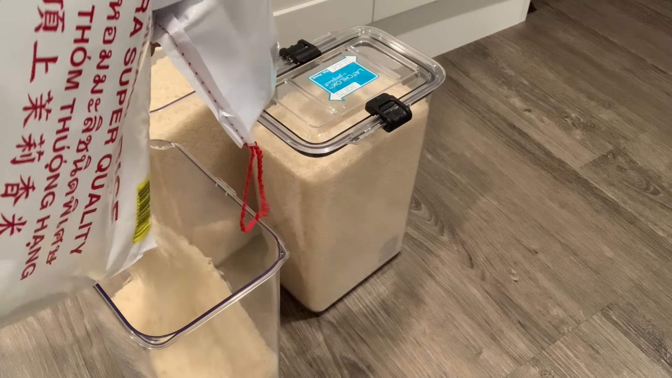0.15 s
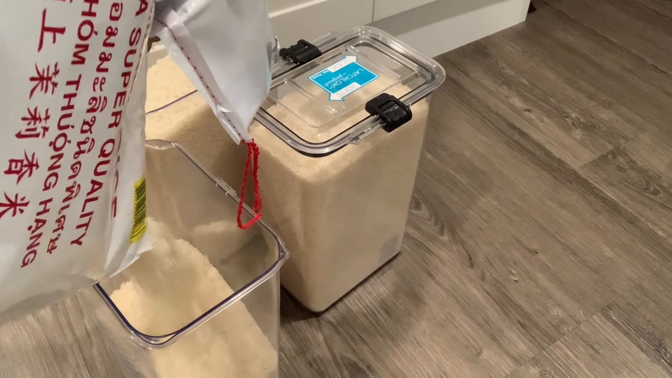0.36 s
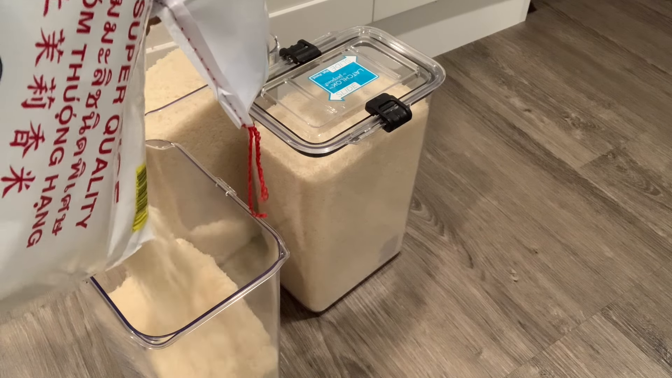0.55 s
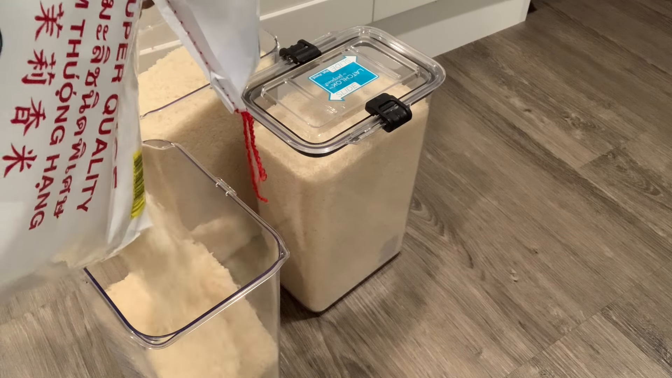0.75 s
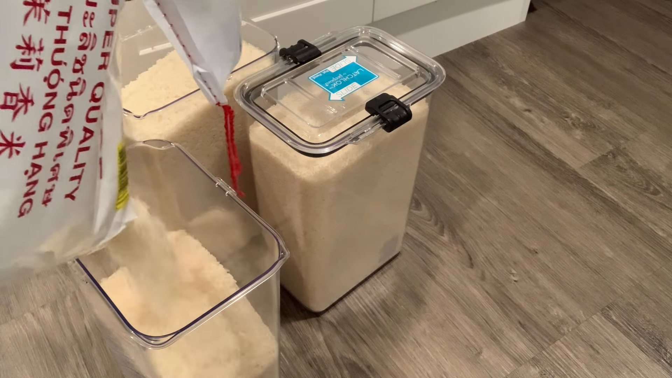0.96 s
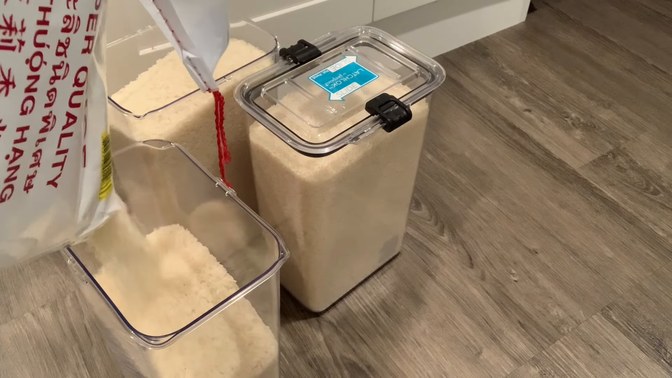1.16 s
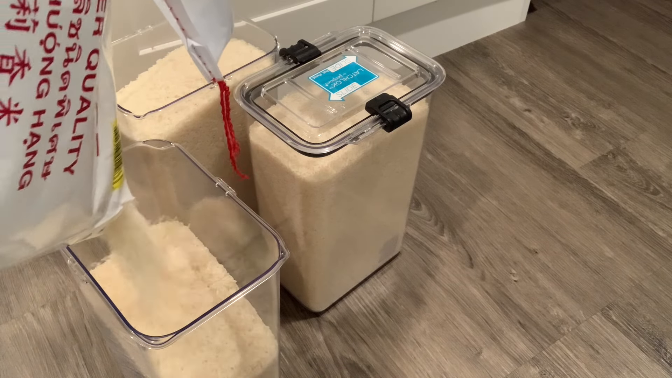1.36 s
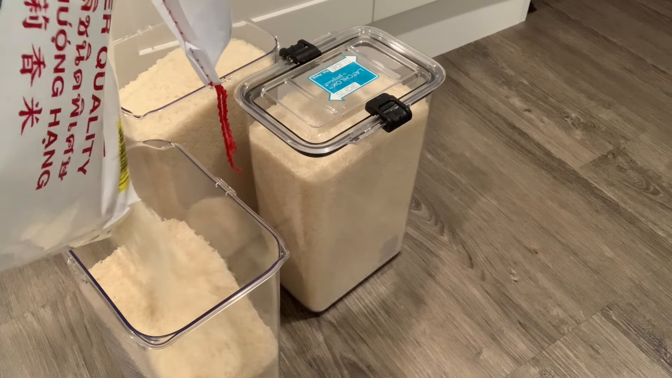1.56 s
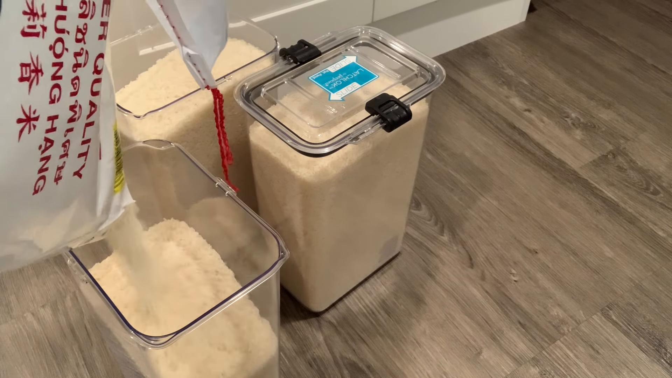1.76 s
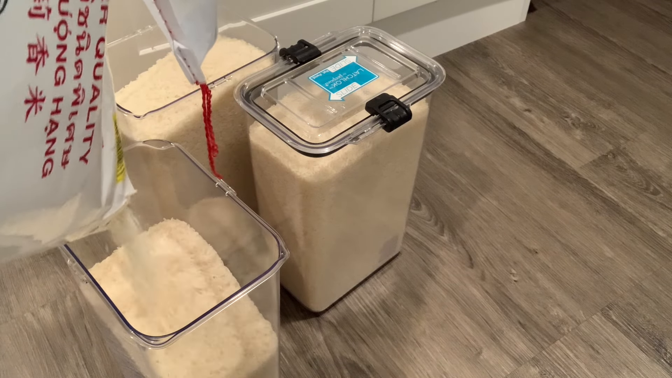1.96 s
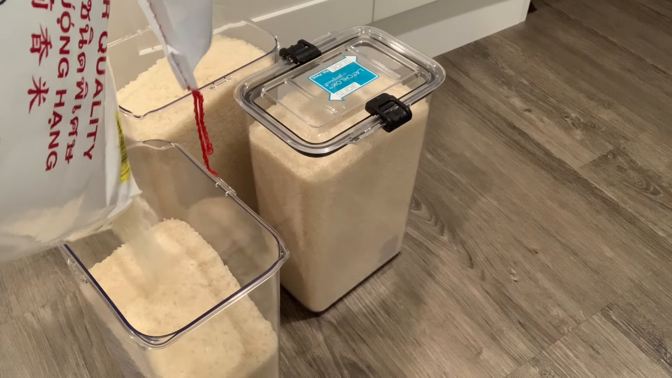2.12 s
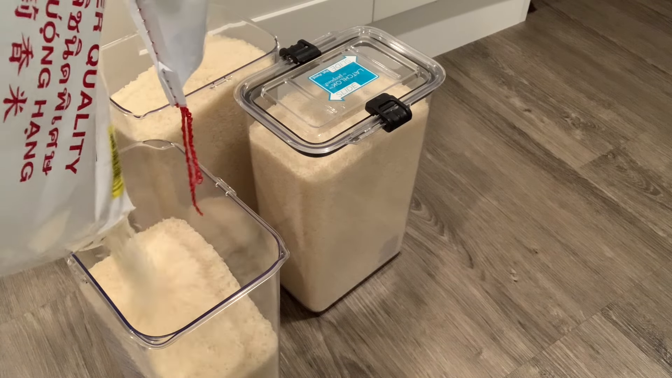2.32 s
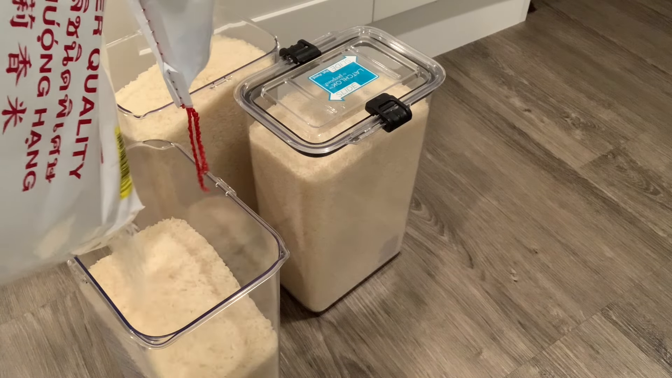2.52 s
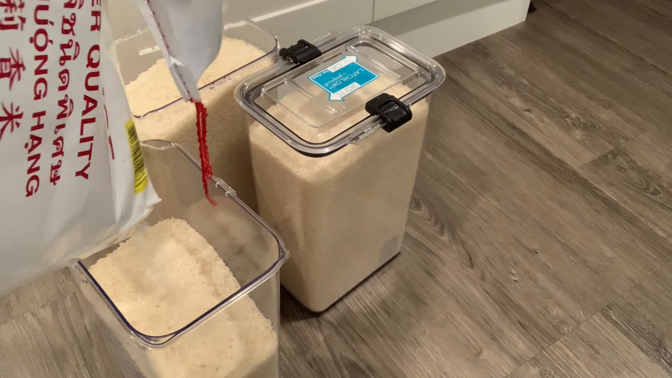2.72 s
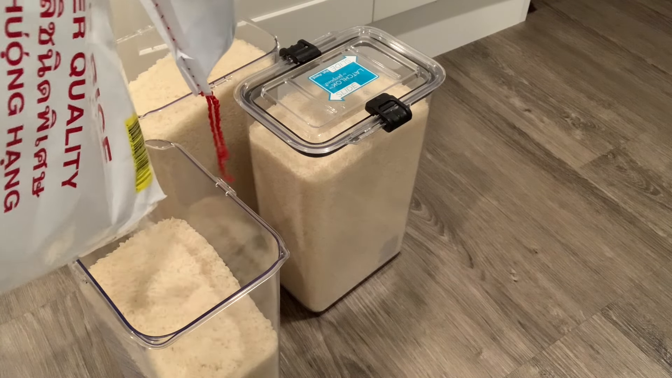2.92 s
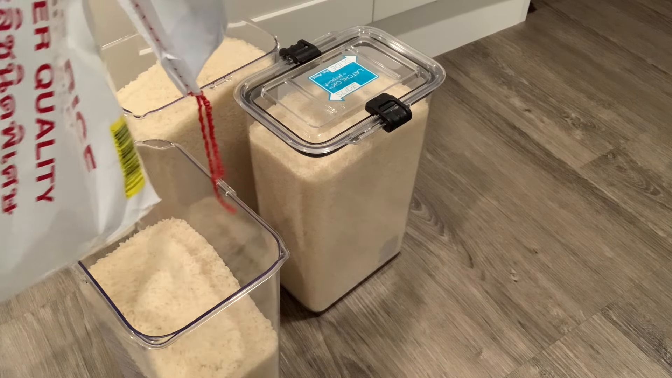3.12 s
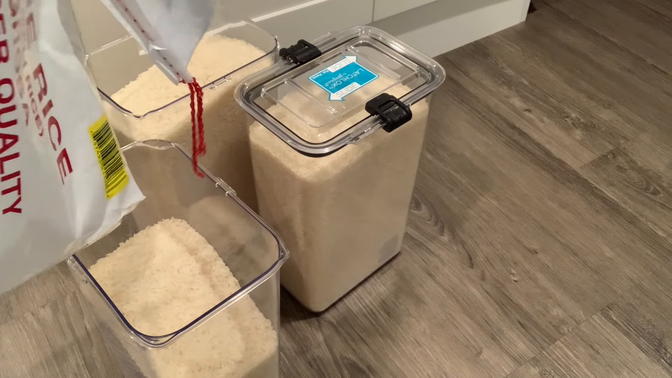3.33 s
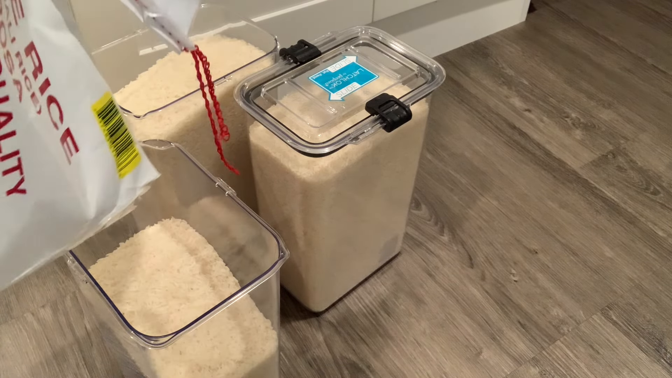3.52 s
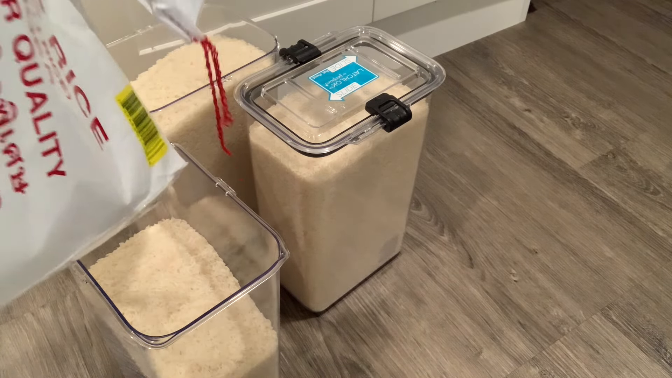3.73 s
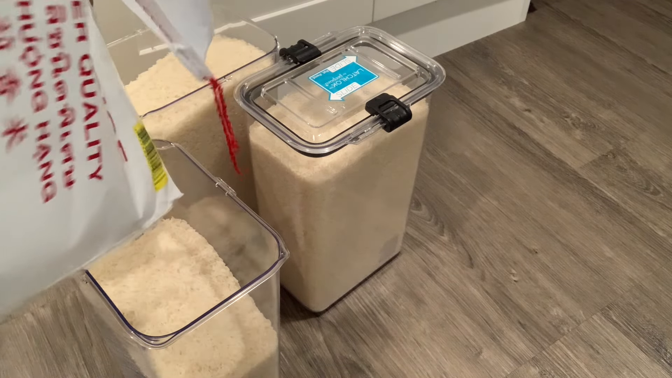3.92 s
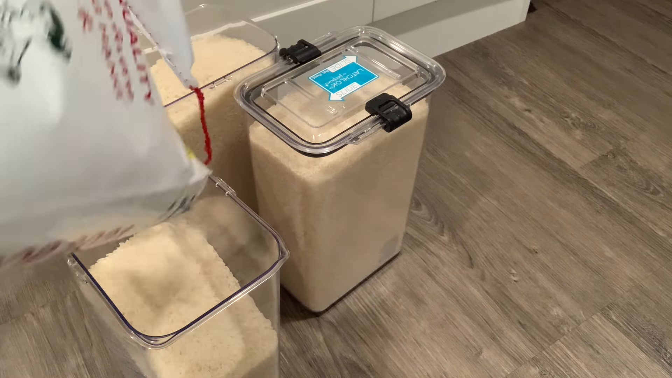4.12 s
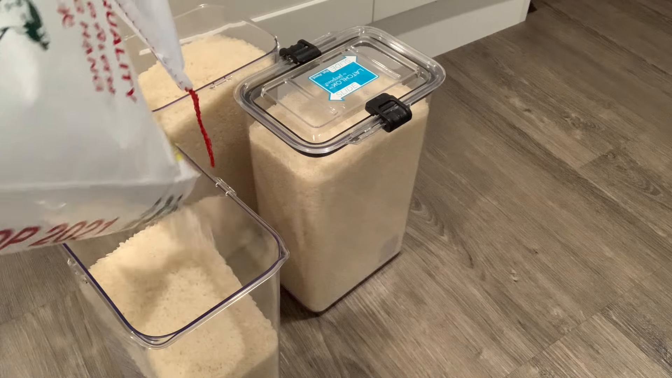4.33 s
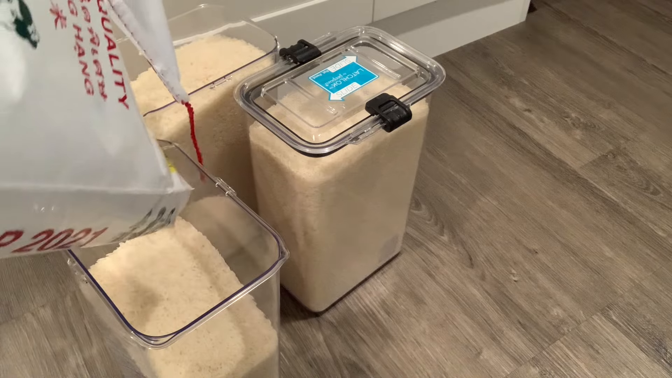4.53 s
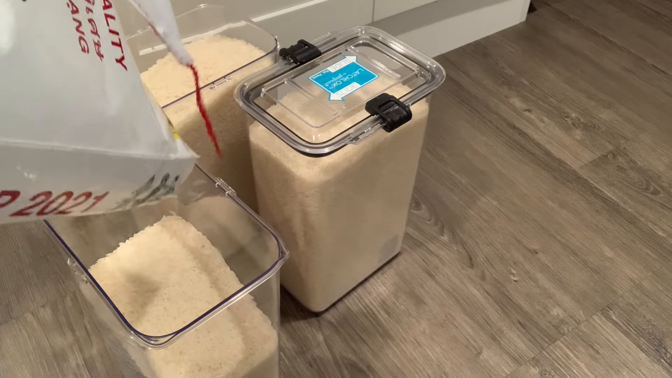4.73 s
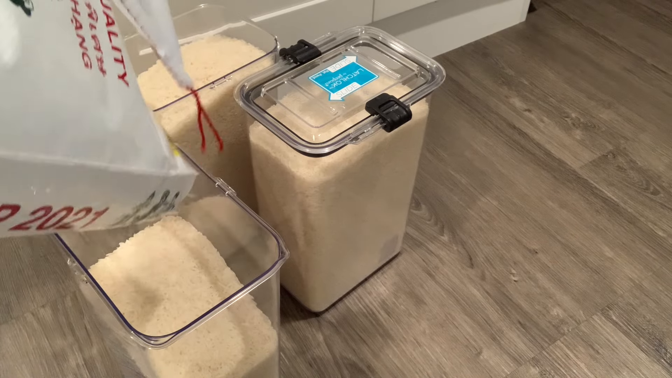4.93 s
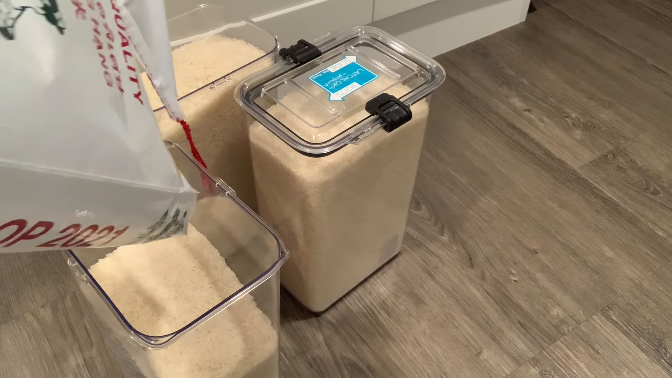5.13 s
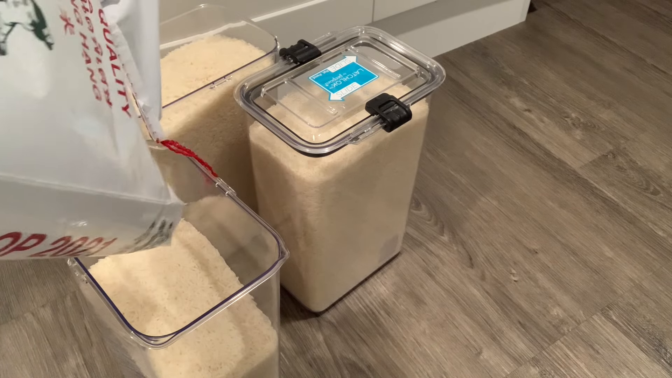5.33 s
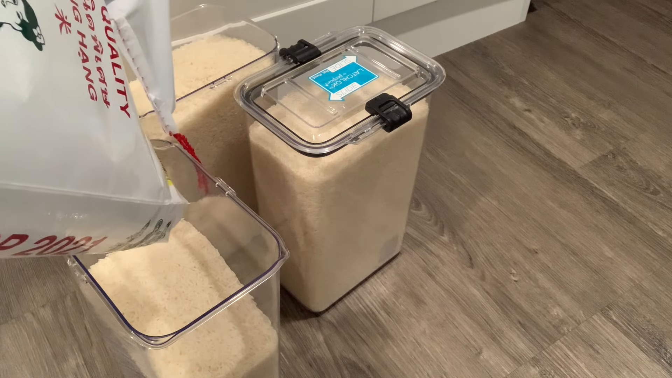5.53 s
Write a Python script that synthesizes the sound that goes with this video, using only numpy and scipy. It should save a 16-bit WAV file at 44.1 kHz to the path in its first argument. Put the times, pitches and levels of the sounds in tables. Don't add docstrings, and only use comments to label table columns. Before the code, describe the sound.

Dry rice pours from a woven plastic sack into a plastic box on a kitchen floor, captured closely in stereo. From 0 s a dense, bright, gritty hiss fills the sound, with a hollow bump and crackly snap near 0.3 s. The rush slowly softens until about 1.5 s, when the sack creases and knocks the box. More knocks follow at 1.85-2.1 s, and a very loud crinkling cluster with a low thump lands near 2.25 s. The rice surges duller, sliding over the heap around 2.6 s, then thins to a near-stop at 3.5-3.9 s, leaving faint pings. Grains return at 4.1 s with a short spill at 4.3 s, then sparse ticks on the plastic wall and light creases. From 5.04 to 5.3 s rapid hollow bumps, low rumbles and a harsh crackle erupt, followed by ticks and a renewed slide of grains until about 5.5 s.

```python
import sys
import numpy as np
from scipy import signal
from scipy.fft import rfft, irfft, next_fast_len
from scipy.io import wavfile

SR = 44100
rng = np.random.default_rng(int(sys.argv[2]) if len(sys.argv) > 2 else 0)


def invert_db(x):
    u = np.asarray(x, float) / 20
    return 10 ** u


def pcm_store(signal):
    levels = np.round(np.clip(np.atleast_2d(signal), -1, 1) * 32767)
    wavfile.write(sys.argv[1], SR, levels.astype(np.int16).T)


N = 245637
SIZE = next_fast_len(N + SR // 2)
HZ = np.arange(SIZE // 2 + 1) * SR / SIZE + 1e-3

# time_s, flow_db
SLIDE_FLOW = [(0.0, -31), (0.2, -30), (0.9, -33), (1.3, -36), (1.88, -37.5), (2.2, -31), (2.6, -28),
              (3.0, -34), (3.3, -40.5), (3.45, -46.5), (3.64, -48), (3.73, -57), (3.91, -54), (4.0, -41),
              (4.35, -35), (4.65, -33), (5.09, -38), (5.5, -29)]
# time_s, flow_db
FALL_FLOW = [(0.0, -28.5), (0.9, -30.5), (1.54, -32.5), (1.88, -35.5), (2.11, -40), (2.2, -34.5),
             (2.42, -34.5), (2.93, -47.5), (3.3, -56), (3.55, -77), (3.77, -66), (4.14, -46.5),
             (4.3, -33.5), (4.59, -50), (4.75, -46), (5.21, -54.5), (5.43, -40), (5.57, -54)]
# time_s, log10 of grains_per_s at each spot
CROWDING = [
    (0, 3.7),
    (2.2, 3.6),
    (2.5, 2.8),
    (3.3, 2.7),
    (3.55, 2.5),
    (3.95, 2.7),
    (4.3, 3.1),
    (4.45, 2.25),
    (5.57, 2.3),
]
# pitch_hz, density_db (per Hz)
GRAIN_COLOUR = [(150, -14), (350, -0.5), (650, 5), (1000, -2.5), (1550, -1.5), (2300, 0.5), (3500, 1.5),
                (5500, -2.5), (7500, -7.5), (9500, -2.5), (12000, -6), (14500, -2.5), (16000, -6)]
# pitch_hz, density_db (per Hz)
RUMBLE_COLOUR = [(12, -44), (20, -11), (41, -3.5), (86, 4.5), (130, -5.5), (221, -1.5), (300, -18),
                 (390, -0.5), (660, -120)]
# start_s, peak_db, hold_s
WEIGHT_SHIFTS = [(0.2, -42, .05), (0.31, -34.5, .005), (0.397, -37, .005), (1.31, -44, .01),
                 (1.565, -30.5, 0.021), (1.755, -45, 0.051), (1.866, -25, 0.016), (1.99, -28.5, .11),
                 (2.242, -24, .03), (2.293, -15.5, .005), (2.35, -34, 0.043), (2.49, -32, 0.0062),
                 (2.637, -41, 0.018), (3.458, -46, 0.047), (3.832, -58, 0.017), (5.113, -27.5, 0.042),
                 (5.24, -24.5, 0.034), (5.298, -19, .005), (5.338, -30.5, 0.017)]
# start_s, peak_db, pitch_hz, boom_db (relative to the peak)
SACK_BUMPS = [(0.163, -20.5, 626, -3), (0.288, -6, 1450, -35), (0.297, -17, 657, 2),
              (1.53, -14.5, 607, 8.5), (1.549, -17.5, 547, -2), (1.853, -13, 1290, -18),
              (1.86, -16.5, 406, -1), (2.011, -18.5, 930, -14), (2.017, -16.5, 380, -25),
              (2.051, -14.5, 826, -21), (2.076, -16.5, 890, 6), (2.097, -24, 370, -25),
              (2.23, -5, 386, -33), (2.242, -12, 393, -18), (2.652, -14.5, 980, 5), (2.669, -19, 620, 0),
              (4.122, -21, 363, -9), (4.542, -14.5, 1480, -40), (5.044, -25, 400, -4),
              (5.078, -15.5, 1560, -12), (5.082, -14.5, 597, 0), (5.106, -19, 394, -2),
              (5.131, -17.5, 610, -9), (5.153, -15.5, 1120, 5), (2.2277, -6.5, 1050, -30),
              (5.201, -16.5, 1230, 5.5), (5.22, -12.5, 1070, 2), (5.243, -9, 860, -27),
              (5.273, -11, 490, 11), (5.301, -13, 360, -5)]
# start_s, peak_db, pitch_hz, crackle_db (relative to the peak)
SACK_CREASES = [(0.282, -14.5, 1500, 9), (0.33, -27, 600, 14), (1.119, -31.5, 300, -7),
                (1.523, -16.5, 1640, 0), (1.568, -24.5, 1130, 5), (1.782, -27, 2160, 5),
                (1.809, -28, 1640, -1), (2.119, -22.5, 670, 8.5), (2.16, -23.5, 1590, 4),
                (2.273, -7.5, 500, -5.5), (2.287, -5, 1080, 0.5), (2.305, -6.5, 390, -2.5),
                (2.445, -17, 1340, 3.5), (2.484, -16, 1230, -15), (2.511, -16, 780, -2),
                (2.826, -22, 870, -7), (3.095, -32, 910, -5), (3.623, -37, 660, -9), (4.404, -19, 1340, -1),
                (4.466, -24, 1460, 5.5), (4.621, -19.5, 2000, -9), (4.688, -23, 1940, 8),
                (4.801, -21, 2100, 6), (4.955, -24, 1230, 5.5), (5.002, -41, 1380, 17),
                (5.2479, -3, 520, 0), (5.258, -7.5, 1010, -7), (5.289, -15, 506, -4), (5.432, -24, 1510, 1),
                (5.494, -19.5, 1480, 7)]
# pitch_hz, width_hz, level_db
BOX_MODES = [
    (363, 18, 1.5),
    (522, 330, 19),
    (657, 26.4, 9),
    (847, 36.6, 9.5),
    (910, 30, 1.5),
    (1230, 97, 4),
    (1604, 49, 8),
]
# start_s, peak_db, pitch_hz
WALL_TICKS = [(0.284, -6.5, 2220), (4.716, -18.5, 2600), (1.5227, -13.5, 2500), (2.227, -24, 2150),
              (2.2737, -6.5, 3820), (2.287, -10, 3120), (2.491, -13, 4420), (2.512, -18, 3200),
              (2.8904, -18.5, 2410), (2.936, -17, 3430), (3.4876, -28.5, 3150), (3.803, -34.5, 3730),
              (4.1729, -11.5, 2950), (4.1797, -16.5, 3580), (4.281, -12.5, 4140), (4.3924, -16.5, 3230),
              (4.467, -16, 2470), (4.5424, -24, 2580), (4.5845, -16, 2170), (4.6203, -22, 3000),
              (4.644, -16, 3400), (4.881, -19, 2250), (4.942, -17, 2310), (5.002, -14.5, 3840),
              (5.067, -17.5, 6960), (5.25, -11, 2500), (5.3627, -11.5, 3800), (5.4308, -12, 5000),
              (5.456, -10.5, 3130), (5.4908, -14, 2360)]
# start_s, peak_db
GRAIN_PINGS = [(2.584, -18), (2.782, -19), (2.824, -18.5), (3.213, -23), (3.2386, -26), (3.3544, -32),
               (3.575, -43), (3.726, -36), (3.7417, -40), (3.7855, -43), (3.8033, -26), (3.8397, -35),
               (3.8775, -29.5), (3.89, -32), (3.9266, -32), (4.175, -20), (4.5403, -22), (4.707, -16),
               (4.736, -23), (4.755, -20.5), (4.8366, -22), (4.874, -23), (4.889, -26), (4.9287, -22),
               (5.0088, -19.5), (5.0484, -18.5), (5.072, -19), (5.3297, -19), (5.4295, -27), (5.453, -17)]
# pitch_hz, share (0
COMMON_SHARE = [(100, 0.2), (600, 0.43), (1400, 0.35), (3000, 0.15), (6500, 0.7), (7600, 0.61),
                (8300, .985), (10200, .985), (11200, .75), (12700, .985), (17000, .985)]
# pitch_hz, phase_radians
LEFT_LEAD = [(20, 0.3), (520, 1.925), (1290, 0.83), (2330, 1.38), (3360, 0.34), (5680, 1.87), (6400, 0.25),
             (7600, 2.07),
             (8200, 2.9), (9200, np.pi), (10300, 3.5), (12700, 6.1), (14000, 2 * np.pi),
                    (17000, 2 * np.pi)]
# pitch_hz, difference_db
LEFT_LEAN = [(60, 38), (110, -18.5), (200, 17.5), (380, 8), (700, 5.0), (1290, 2), (2380, -1.5),
             (4400, 0.5), (8120, 1.5), (15000, 0.5)]

BOOM_HZ, THUD_HZ, TICK_HZ, PING_HZ = (120, 800), (800, 2200), (2200, 7000), (7000, 17000)
BOOM_SLIDE, BOOM_FALL, BOOM_DB = 0.77, 0.11, -13.5
WALL_SLIDE, WALL_FALL, WALL_DB = 0.95, 0.25, 6
SCATTER_DB = 1
HUM_DB = -66
SHIFT_RISE_DB_PER_S, SHIFT_FALL_DB_PER_S = 450, 365
SHUDDER_FALL, SHUDDER_DB, STILL_DB = 0.99, -18, -60.5
BUMP_CRACKLE_DB, CREASE_BOOM_DB = -13, -29
BUMP_T60_S, CREASE_T60_S, T60_SLOPE = 0.048, 0.042, -0.15
PING_BODY_HZ, PING_BODY_DB = (2500, 6700), -5


def in_time(rows):
    times_s, *columns = np.transpose(rows)
    return [np.interp(np.arange(N) / SR, times_s, column) for column in columns]


def at_hz(points):
    hz, value = np.transpose(points)
    return np.interp(np.log(HZ), np.log(np.maximum(hz, 20)), value)


def rms_one(x):
    return x / np.sqrt(np.mean(np.abs(x) ** 2) + 1e-20)


def band(edges_hz):
    sos = signal.butter(3, edges_hz, "band", fs=SR, output="sos")
    return signal.sosfreqz(sos, HZ, fs=SR)[1]


def drift(rate):
    r = np.exp(-80 * np.pi * rate / SR)
    noise = rng.standard_normal(N // 40 + 2002)
    slow = signal.lfilter([1], [1, -2 * r, r * r], noise)[2000:]
    return np.interp(np.arange(N) / 40, np.arange(len(slow)), rms_one(slow))


def ports(t60, turn=0., wet=1.):
    t = np.arange(SR // 4) / SR
    echoes = rng.standard_normal((2, len(t))) * invert_db(-60 * t / max(t60, .003))
    echoes /= np.sqrt(np.sum(echoes ** 2, axis=1, keepdims=True))
    echoed = np.clip(wet * (1 - at_hz(COMMON_SHARE)), 0, 1)
    side = np.array([[.5], [-.5]])
    lead = at_hz(LEFT_LEAD) + turn
    direct = np.sqrt(1 - echoed) * np.exp(1j * side * lead)
    return invert_db(side * at_hz(LEFT_LEAN)) * (direct + np.sqrt(echoed) * rfft(echoes, SIZE))


def grains(per_s, spread_db):
    chance = np.clip(per_s / SR, 1e-4, 1)
    sizes = invert_db(spread_db * np.minimum(rng.exponential(1, N), 4))
    sizes = rms_one(sizes * rng.choice([-1, 1], N))
    return sizes * (rng.random(N) < chance) / np.sqrt(chance)


def pour():
    heap_db, ping_db, crowding = in_time(SLIDE_FLOW)[0], in_time(FALL_FLOW)[0], in_time(CROWDING)[0]
    boom = invert_db(BOOM_DB + BOOM_SLIDE * heap_db + BOOM_FALL * ping_db)
    boom_db = 20 * np.log10(boom + invert_db(HUM_DB))
    wall_db = WALL_DB + WALL_SLIDE * heap_db + WALL_FALL * ping_db + SCATTER_DB * (3 - crowding)
    per_s, gush, colour = 10 ** crowding, drift(19.4), invert_db(at_hz(GRAIN_COLOUR))
    # range_hz, level_db, share of the grain rate, gush_db
    kinds = [(BOOM_HZ, boom_db + 5.0, .3, 1.2),
             (THUD_HZ, heap_db + 3.0, .45, 1.2),
             (TICK_HZ, wall_db + 3.0, .9, 1.1),
             (PING_HZ, ping_db + 6.5, 2.5, .8)]
    spots = [ports(t60=0.03, wet=.95) for spot in range(7)]
    out = 0
    for edges_hz, level_db, rate_share, gush_db in kinds:
        gain = invert_db(level_db + gush_db * (gush + 0.45 * drift(25)))
        voice = colour * band(edges_hz)
        voice = voice / np.sqrt(len(spots) * np.mean(np.abs(voice) ** 2))
        for spot in spots:
            impacts = gain * grains(rate_share * per_s, spread_db=3.0)
            out = out + rfft(impacts, SIZE) * voice * spot
    return out


def shudder():
    t = np.arange(N) / SR
    power = invert_db(SHUDDER_DB + SHUDDER_FALL * in_time(FALL_FLOW)[0]) ** 2 + invert_db(STILL_DB) ** 2
    for start_s, peak_db, hold_s in WEIGHT_SHIFTS:
        rise_db = SHIFT_RISE_DB_PER_S * np.maximum(start_s - t, 0)
        fall_db = SHIFT_FALL_DB_PER_S * np.maximum(t - start_s - hold_s, 0)
        power = power + invert_db(peak_db - rise_db - fall_db) ** 2
    return np.sqrt(power)


def rumble():
    noise = rfft(rng.standard_normal((2, N)), SIZE) * invert_db(at_hz(RUMBLE_COLOUR))
    mid, side = irfft(noise, SIZE)[:, :N]
    opposed = invert_db(5) * rms_one(.1 * mid + side) * np.array([[1], [-1]])
    return invert_db(-2.0) * shudder() * (rms_one(mid) + opposed)


def bursts(times, level_db, t60, length=N):
    out, t = np.zeros(length + SR), np.arange(SR // 4) / SR
    attack = np.minimum(t / 0.00051, 1)
    for start_s, db, decay_s in np.broadcast(times, level_db, t60):
        out[round(start_s * SR):][:len(t)] += invert_db(db - 60 * t / np.clip(decay_s, .002, .3)) * attack
    return out[:length]


def resonate(x, hz, width):
    r, w = np.exp(-np.pi * max(width, 30) / SR), 2 * np.pi * hz / SR
    return signal.lfilter([(1 - r * r) / 2, 0, (r * r - 1) / 2], [1, -2 * r * np.cos(w), r * r], x + 1e-18)


def rings(times, level_db, pitch_hz, t60, sharpness, rustle_db):
    out, length = np.zeros(N + SR), SR // 4
    events = np.broadcast(times, level_db, pitch_hz, t60)
    noises = rng.standard_normal((len(times), length))
    for (start_s, db, hz, decay_s), noise in zip(events, noises):
        width = hz / sharpness
        puff = noise * bursts([0], db + rustle_db, decay_s, length) * np.sqrt(2200 / width)
        puff[10] += invert_db(db) * SR / (2 * np.pi * width) * np.sign(noise[0])
        ring = resonate(resonate(puff, hz, width), hz, 2.23 * width)
        out[round(start_s * SR):][:length] += ring
    return out[:N]


def knocks():
    rows = []
    for s, db, hz, boom_db in SACK_BUMPS:
        rows.append((s, db, hz, boom_db, BUMP_CRACKLE_DB, BUMP_T60_S * (hz / 700) ** T60_SLOPE))
    for s, db, hz, crackle_db in SACK_CREASES:
        rows.append((s, db, hz, CREASE_BOOM_DB, crackle_db, CREASE_T60_S * (hz / 700) ** T60_SLOPE))
    return np.transpose(rows)


def sack():
    s, peak_db, hz, boom_db, crackle_db, t60 = knocks()
    octaves = np.abs(np.log2(hz / np.array(BOX_MODES)[:, :1]))
    uneven_db = -16 * octaves + 2 * rng.standard_normal((len(s), len(BOX_MODES))).T
    body = rings(s, peak_db + 8.5, hz, 1.31 * t60, sharpness=1.38, rustle_db=0.0)
    for (mode_hz, width, db), touch_db in zip(BOX_MODES, uneven_db):
        blows = np.zeros(N)
        sizes = invert_db(peak_db + db - 8.0 + touch_db) * rng.choice([-1, 1], len(s))
        np.add.at(blows, np.round(s * SR).astype(int), sizes)
        body += resonate(blows * SR / (2 * np.pi * width), mode_hz, width)
    boom = bursts(s, peak_db + boom_db + 4.5, 2.8 * t60) * rng.standard_normal(N)
    boom = rfft(boom, SIZE) * band((100, 400))
    crackle = bursts(s, peak_db + crackle_db + 5.0, 0.55 * t60) * grains(5500, spread_db=-0.5)
    crackle = rfft(crackle, SIZE) * (band((1700, 6000)) + invert_db(-12.5) * band(PING_HZ))
    beside = ports(t60=.04, turn=.35, wet=.16)
    return (rfft(body, SIZE) + boom) * beside + crackle * ports(t60=0.16, turn=1.0, wet=1.0)


def lone_grains():
    s, peak_db, hz = np.transpose(WALL_TICKS)
    ticks = rings(s, peak_db + 3.5, hz, t60=.018, sharpness=1.5, rustle_db=3.5)
    ticks = rfft(ticks, SIZE) * ports(t60=.025, turn=.15, wet=.4)
    s, peak_db = np.transpose(GRAIN_PINGS)
    pings = bursts(s, peak_db + 6.0, t60=0.011) * rng.standard_normal(N)
    pings = rfft(pings, SIZE) * (band(PING_HZ) + invert_db(PING_BODY_DB) * band(PING_BODY_HZ))
    return ticks + pings * ports(t60=0.1, turn=0.41)


def scene():
    return irfft(pour() + sack() + lone_grains(), SIZE)[:, :N] + rumble()


def band_limit(x):
    return signal.sosfilt(signal.butter(12, 16410, fs=SR, output="sos"), x)


def record(dry):
    treble_cut = signal.ellip(12, .5, 70, 15780, fs=SR, output="sos")
    mix = np.clip(signal.sosfilt(treble_cut, dry), -1, 1)
    return band_limit(mix)


dry = scene()
out = record(dry)
pcm_store(out)
```